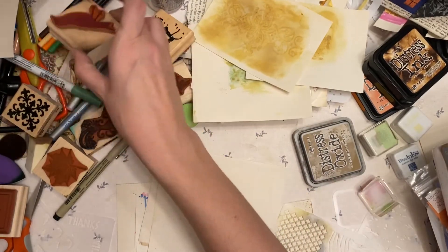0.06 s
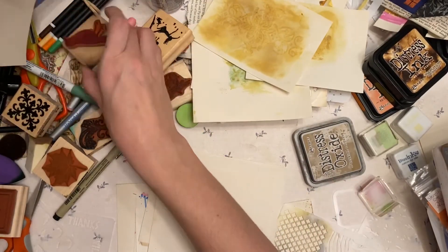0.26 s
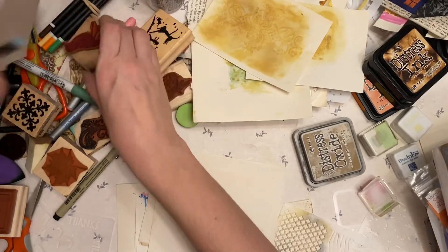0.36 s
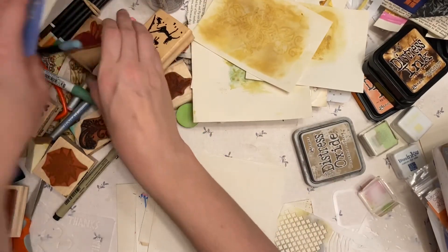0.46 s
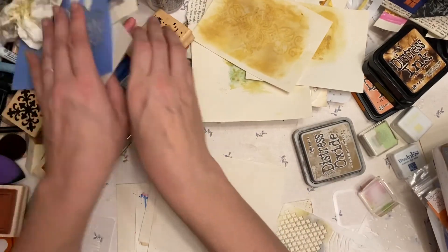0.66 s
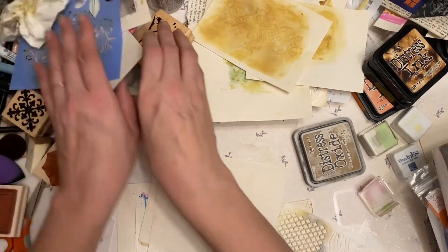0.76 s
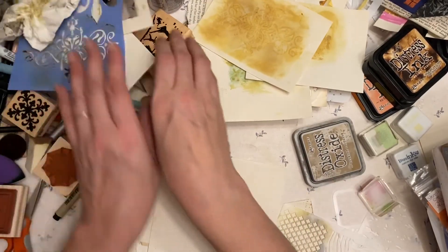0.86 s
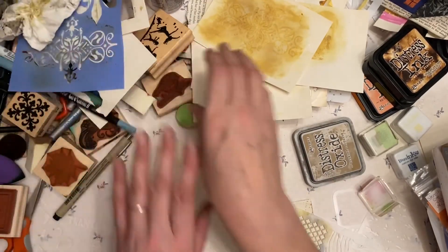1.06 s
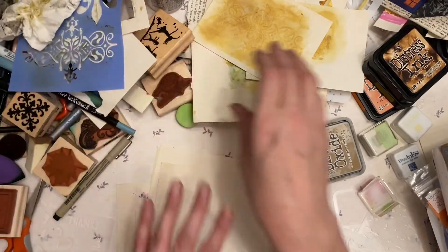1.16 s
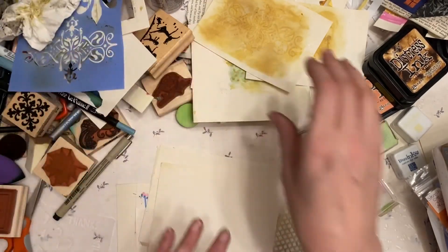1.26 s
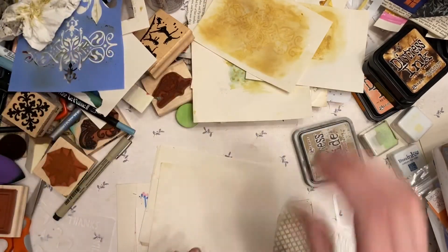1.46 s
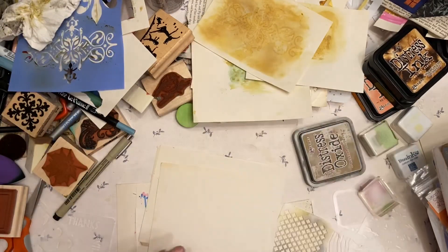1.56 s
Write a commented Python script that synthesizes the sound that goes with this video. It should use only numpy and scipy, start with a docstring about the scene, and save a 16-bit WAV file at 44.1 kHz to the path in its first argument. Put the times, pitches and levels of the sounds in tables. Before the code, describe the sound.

Close stereo pickup in a small furnished room: faint scuffs, a burst of low wooden thumps, juddering plastic scraping with another sharp knock and small clicks, then only soft rumble and faint hiss.

```python
"""Wooden stamp blocks are nudged and set down on a cluttered craft table, heard from close by.
Each knock is built from a table-top thump, a clack that rings the block and a tick at its edge.
A plastic stencil drags over the clutter as grainy, juddering noise: a dull rub and a bright hiss.
Small scuffs and pitched edge squeaks fall between the knocks, with a short room echo on all but
the thumps; the movement then fades, leaving the quiet room: low rumble and faint hiss."""
import sys
import numpy as np
from scipy import signal
from scipy.fft import rfft, irfft
from scipy.io import wavfile
from scipy.ndimage import uniform_filter1d, map_coordinates

SR = 44100
rng = np.random.default_rng(int(sys.argv[2]) if len(sys.argv) > 2 else 0)


def unload_audio(sound):
    """Save the sound as a 16-bit wav file, at the path given as the first command line argument."""
    columns = np.transpose(np.atleast_2d(sound))
    # keep every value between -1 and 1, then stretch to whole-number steps
    steps = np.round(np.clip(columns, -1, 1) * 32767)
    wavfile.write(sys.argv[1], SR, steps.astype(np.int16))


N = 70560
HZ = np.fft.rfftfreq(N, 1 / SR)
TIME = np.arange(N) / SR
RING_S = np.arange(SR // 4) / SR  # time axis of one blow

# hiss of the sliding stencil: (time [s], level [dB])
SLIDE_HISS_LEVEL = [(0, -68), (.09, -78), (.15, -67.5), (.21, -69), (.255, -81), (.295, -62.5),
                    (.37, -57.5), (.402, -51), (.423, -55.5), (.44, -58), (.475, -55), (.52, -52.5),
                    (.6, -55), (.67, -51), (.724, -50), (.745, -62.5), (.81, -57.5), (.86, -60.5),
                    (.97, -68), (1.12, -80), (1.6, -79)]
# dull rubbing of the sliding stencil: (time [s], level [dB])
SLIDE_RUB_LEVEL = [(0, -76), (.11, -62), (.2, -65.5), (.28, -58), (.37, -61.5), (.5, -55), (.52, -46.5),
                   (.56, -50.5), (.605, -49), (.64, -45), (.69, -52), (.735, -56), (.77, -47),
                   (.783, -53.5), (.82, -57.5), (.9, -76), (1.02, -68.5), (1.15, -77), (1.36, -72.5),
                   (1.6, -77)]
# colour of the stencil's hiss: (frequency [Hz], relative density [dB per Hz])
HISS_SPECTRUM = [(300, -23), (1500, -9), (2700, 7.5), (4000, -1), (5300, 7.5), (6800, -6), (8500, 3),
                 (10500, 3), (12500, -0.5), (14000, -36), (16000, 2.5)]
# colour of the stencil's rub: (frequency [Hz], relative density [dB per Hz])
RUB_SPECTRUM = [(60, 9), (200, 1), (400, 7), (800, 1.5), (1400, 2), (2000, 0.5), (2600, -4.5),
                (5000, -11.5), (16000, -18)]
# decay of the room echo: (frequency [Hz], t60 [s])
ECHO_DECAY = [(100, 0.063), (500, 0.74), (2000, 0.48), (8000, 0.084), (16000, 0.41)]
# colour of the room tone: (frequency [Hz], relative density [dB per Hz])
ROOM_SPECTRUM = [(20, -57), (45, 6), (90, 1.5), (160, -6), (235, -1), (320, -12), (460, -7.5), (650, -35.5),
                 (1100, -26.5), (1900, -16.5), (3000, -32), (5500, -32.5), (9500, -35), (16000, -36)]
# short scuffs of wood and plastic: (time of peak [s], Gaussian spread [s], level [dB], band centre [Hz])
SCUFF_EVENTS = [(0.122, 0.01, -60, 3800), (0.143, 0.004, -51.5, 4450), (0.163, 0.022, -59, 4270),
                (0.395, 0.0051, -44, 5580), (0.432, 0.0014, -41.5, 10700), (0.45, 0.011, -51.5, 4900),
                (0.519, 0.007, -47.5, 4470), (0.547, 0.0064, -46.5, 10300), (0.588, 0.0021, -50.5, 10400),
                (0.673, 0.0018, -48.5, 10400), (0.7889, 0.0012, -42, 9800), (0.794, 0.0039, -55.5, 4130),
                (0.808, 0.0072, -47.5, 4650), (0.839, 0.0022, -57.5, 10400), (1.005, 0.0057, -65.5, 1680),
                (1.03, 0.0087, -72, 1850)]
# colour of scuffing before each band is picked: (frequency [Hz], relative density [dB per Hz])
SCUFF_SPECTRUM = [(150, -1), (600, 0), (1300, 6), (2700, -4), (3800, -1.5), (5300, -6), (6800, -2.5),
                  (9500, -3.5), (13000, -11), (16000, -10)]
# a block lands and the table top gives: (time [s], level before halving [dB], pitch [Hz], t60 [s])
THUMP_EVENTS = [(0.111, -51, 248, 0.081), (0.2293, -39.5, 373, 0.025), (0.233, -25, 193, 0.01),
                (0.246, -32.5, 288, 0.025), (.254, -31.5, 144, 0.088), (.281, -24.5, 182, 0.031),
                (0.3036, -15.5, 210, 0.024), (.310, -29.5, 325, 0.058), (0.316, -34.5, 236, 0.035),
                (0.332, -30, 195, 0.041), (0.344, -35, 227, 0.028), (.402, -46, 250, 0.11),
                (0.4327, -27.5, 186, 0.09), (0.6259, -20.5, 185, 0.036), (0.582, -41, 185, 0.049),
                (0.772, -46.5, 175, 0.066), (1.007, -48.5, 181, 0.039)]
# ringing modes of the table top: (frequency [Hz], relative level [dB], t60 [s])
TABLE_MODES = [(65.6, -23, 0.061), (104, 9, 0.049), (139.6, 6, 0.2), (190.3, 1, 0.24), (318, -5, 0.049),
               (392, 8, 0.24)]
# blocks and pads touch:
# (time [s], clack level [dB], lowest [Hz], highest [Hz], chatter t60 [s], edge tick level [dB])
CLACK_EVENTS = [(0.1402, -52.5, 1160, 1380, 0.062, -70), (.2287, -40, 600, 2430, 0.023, -70),
                (0.266, -47.5, 1120, 1680, 0.012, -45.5), (.2775, -46.5, 836, 1400, 0.031, -51),
                (0.2985, -37.5, 605, 790, 0.0097, -57), (0.3095, -60, 1010, 1370, 0.023, -52.5),
                (.3308, -49, 515, 1480, 0.056, -68), (0.3931, -48, 2370, 3900, 0.035, -70),
                (.4300, -47, 1670, 2900, 0.08, -49), (0.489, -44, 1600, 4640, 0.043, -49),
                (0.5109, -43.5, 447, 1900, 0.055, -44.5), (0.6247, -27.5, 515, 1550, 0.012, -38.5),
                (0.6566, -45, 1210, 1870, 0.16, -52), (.6885, -45.5, 900, 1180, 0.054, -63),
                (0.7467, -46.5, 564, 1310, 0.12, -79), (0.7625, -45, 815, 1920, 0.12, -45),
                (0.7888, -39.5, 1100, 2020, 0.028, -45), (0.8096, -43, 670, 2030, 0.02, -50.5),
                (0.8617, -56, 4600, 5240, 0.01, -56), (0.89, -70, 4700, 5200, 0.022, -55.5),
                (0.9622, -60.5, 1120, 2440, 0.023, -78), (1.0814, -56, 590, 3130, 0.039, -67)]
# ringing modes of a stamp block: (frequency [Hz], relative level [dB], t60 [s])
BLOCK_MODES = [(698, 6, 0.061), (865, -2, 0.068), (1120, 2.5, 0.06), (1327, 2.5, 0.039), (1626, 3.5, 0.02),
               (2120, -13.5, 0.021), (2940, -1.5, 0.026), (3800, -16, .016), (5730, -8, 0.011)]
# colour of the edge tick: (frequency [Hz], relative density [dB per Hz])
TICK_SPECTRUM = [(200, -23), (1200, 13), (2800, 6.5), (4200, 7), (5400, 9), (7000, 4.5), (10500, -5.5),
                 (13000, 1), (16000, -13.5)]
# a block drops and bounces once: (time [s], level [dB])
DROP_EVENTS = [(0.2288, -36), (.2505, -77)]
# edges squeak as they skid: (time [s], hold [s], level [dB], start pitch [Hz], end pitch [Hz])
CHIRP_EVENTS = [(0.6187, 0.0036, -35, 1940, 1915), (0.6878, 0.0066, -40, 1284, 1582),
                (0.72, 0.0048, -53.5, 5120, 5200)]
# how far the left port leads the right: (frequency [Hz], phase [rad])
PORT_PHASE_LEAD = [(20, 0), (300, .02), (1700, .1), (2580, 1.0), (4310, .9), (5080, -.3), (6460, 2.4),
                   (7450, 3.14), (8400, 3.9), (9730, 6.1), (11600, 6.9), (12600, 9.0), (13500, 9.42),
                   (14400, 9.8), (15300, 12.2)]
# likeness of left and right: (frequency [Hz], share in common [0 to 1])
PORT_LIKENESS_SHARE = [(20, 1), (400, 0.79), (1500, 0.88), (2800, 0.45), (7000, 1), (16000, 0.91)]
# left minus right: (frequency [Hz], balance [dB])
PORT_LEVEL_BALANCE = [(300, 0.33), (700, 4), (1400, 0.4), (2800, -1.5), (9000, -0.1)]

GRAINS_PER_S, GRAIN_SPREAD_DB, SMOOTH_SHARE = 2000, 2.6, 0.45
JUDDER_DB, JUDDER_HZ = 1.64, 130
PATCH_DB, PATCH_HZ, PATCH_S, PATCH_ABOVE_HZ = 4, 220.1, 0.018, 860
ECHO_DB, ROOM_DB = -16.5, -64
SCUFF_OCTAVES, SCUFF_SKIRT_DB = 0.35, -6
THUMP_RISE_S, TABLE_RING_DB = 0.0019, -17.5
CLACK_RISE_S, CLACK_SNAP_DB, BLOCK_RING_DB, TICK_T60_S = 0.00032, 16.5, -20, 0.021
CHIRP_RISE_S, CHIRP_T60_S, CHIRP_OVERTONE_DB = 0.00063, 0.021, -11
CHIRP_WAVER = 0.083  # rms, as a fraction of the pitch
LOW_CUT_HZ, EDGE_HZ = 65.3, 15850


def amp(db):
    """Decibels to gain."""
    return 10 ** (np.asarray(db) / 20)


def unit(x):
    """Scales to rms 1."""
    return x / np.sqrt(np.mean(x ** 2) + 1e-20)


def struck(x):
    """Scales a blow to rms 1 over its loudest few milliseconds."""
    return x / np.sqrt(uniform_filter1d(x ** 2, size=128).max() + 1e-20)


def read(points, hz):
    """Reads a table on a log-frequency axis."""
    f, value = np.transpose(points)
    return np.interp(np.log(hz + 1), np.log(f + 1), value)


def colour(x, spectrum):
    """Gives a sound a spectrum, at rms 1."""
    gain = amp(read(spectrum, np.fft.rfftfreq(len(x), 1 / SR)))
    return unit(irfft(rfft(x) * gain, len(x)))


def fade(t, t60):
    """Exponential decay that falls 60 dB in t60 seconds."""
    return np.exp(-np.log(1000) * t / t60)


def add(mix, s, sound):
    """Mixes a sound in at a time, cutting it at the end of the mix."""
    part = mix[round(s * SR):][:len(sound)]
    part += sound[:len(part)]


def ring(x, modes):
    """An object's modes, decaying sines of alternating sign, ring when driven by x."""
    response = np.zeros(len(RING_S))
    for k, (hz, db, t60) in enumerate(modes):
        response += (-1) ** k * amp(db) * fade(RING_S, t60) * np.sin(2 * np.pi * hz * RING_S)
    return struck(signal.fftconvolve(x, response)[:len(x)])


def pair(a, b):
    """Two independent sounds become a partly alike left and right."""
    same = np.clip(read(PORT_LIKENESS_SHARE, HZ), 0, 1)
    right = irfft(same * rfft(a) + np.sqrt(1 - same ** 2) * rfft(b), N)
    return np.array([a, right])


def patchy(x):
    """Brief resonances come and go as the point of contact moves, mostly in the treble."""
    hz, t, z = signal.stft(x, SR, nperseg=512, noverlap=384)
    grid = rng.standard_normal((400, 400))
    places = np.meshgrid(hz / PATCH_HZ, t / PATCH_S, indexing="ij")
    field = map_coordinates(grid, places, order=1, mode="mirror")
    depth_db = PATCH_DB * hz[:, None] / (hz[:, None] + PATCH_ABOVE_HZ)
    return signal.istft(z * amp(depth_db * unit(field)), SR, nperseg=512, noverlap=384)[1][:, :N]


def slips():
    """Dense tiny slips of uneven size over a smooth hiss."""
    starts = rng.random(N) < GRAINS_PER_S / SR
    signs = rng.choice([-1, 1], N)
    sizes = amp(GRAIN_SPREAD_DB * np.minimum(rng.exponential(1, N), 4))
    grains = unit(starts * signs * sizes)
    return SMOOTH_SHARE * rng.standard_normal(N) + (1 - SMOOTH_SHARE) * grains


def friction(spectrum):
    """Slips whose level judders slowly and at random, coloured and heard at both ports."""
    slow_noise = unit(irfft(rfft(rng.standard_normal(N)) / (1 + (HZ / JUDDER_HZ) ** 4), N))
    judder = amp(JUDDER_DB * slow_noise)
    left, other = colour(slips() * judder, spectrum), colour(slips() * judder, spectrum)
    return unit(patchy(pair(left, other)))


def stencil():
    """The plastic sheet slides: friction gives a dull rub and a bright hiss, each with its own level."""
    hiss_gain = amp(np.interp(TIME, *np.transpose(SLIDE_HISS_LEVEL)))
    rub_gain = amp(np.interp(TIME, *np.transpose(SLIDE_RUB_LEVEL)))
    return friction(HISS_SPECTRUM) * hiss_gain + friction(RUB_SPECTRUM) * rub_gain


def echo(x):
    """The short tail of a small furnished room: noise that decays at its own rate in each band."""
    hz, t, z = signal.stft(rng.standard_normal((2, SR // 2)), SR, nperseg=256)
    decay = fade(t, read(ECHO_DECAY, hz)[:, None])
    tail = signal.istft(z * decay, SR, nperseg=256)[1]
    return signal.fftconvolve(x, tail / np.linalg.norm(tail[0]), axes=1)[:, :N]


def room_tone():
    """Steady low rumble and faint hiss, made of coloured noise."""
    left, other = (colour(rng.standard_normal(N), ROOM_SPECTRUM) for _ in range(2))
    return amp(ROOM_DB) * pair(left, other)


def scuffs():
    """Things shift a little against each other: swells of friction, each with its own brightness."""
    out = np.zeros((2, N))
    rubbing = rfft(friction(SCUFF_SPECTRUM))
    for s, spread, db, centre_hz in SCUFF_EVENTS:
        octaves = np.log2((HZ + 1) / centre_hz)
        band = np.exp(-0.5 * (octaves / SCUFF_OCTAVES) ** 2) + amp(SCUFF_SKIRT_DB)
        swell = np.exp(-0.5 * ((TIME - s) / spread) ** 2)
        out += unit(irfft(rubbing * band, N)) * amp(db) * swell
    return out


def thumps():
    """The table top swings a few times under each block, then rings on faintly."""
    out = np.zeros(N)
    rise = 1 - np.exp(-(RING_S / THUMP_RISE_S) ** 2)
    for s, db, hz, t60 in THUMP_EVENTS:
        swing = struck(rise * fade(RING_S, t60) * np.sin(2 * np.pi * hz * RING_S))
        table_ring = amp(TABLE_RING_DB) * ring(swing, TABLE_MODES)
        add(out, s, amp(db) * (swing + table_ring) / 2)
    return out


def clacks():
    """Each touch is a snap and a brief chatter that ring the block, with a bright tick from its edge."""
    out, ticks = np.zeros(N), np.zeros((2, N))
    attack = 1 - np.exp(-RING_S / CLACK_RISE_S)
    snap = amp(CLACK_SNAP_DB) * (RING_S == 0)  # a single sample
    for s, db, low_hz, high_hz, t60, tick_db in CLACK_EVENTS:
        chatter, *edges = rng.standard_normal((3, len(RING_S)))
        force = chatter * attack * fade(RING_S, t60) + snap
        band = signal.butter(2, [low_hz, high_hz], "bandpass", fs=SR, output="sos")
        burst = struck(signal.sosfilt(band, force))
        block_ring = amp(BLOCK_RING_DB) * ring(burst, BLOCK_MODES)
        add(out, s, amp(db) * struck(burst + block_ring))
        for port, edge in zip(ticks, edges):
            tick = struck(colour(edge, TICK_SPECTRUM) * attack * fade(RING_S, TICK_T60_S))
            add(port, s, amp(tick_db) * tick)
    return out + pair(*ticks)


def drops():
    """A block falls free of the fingers, so one clean blow rings all its modes at each landing."""
    out = np.zeros(N)
    blow = 1.0 * (RING_S == 0)
    for s, db in DROP_EVENTS:
        add(out, s, amp(db) * ring(blow, BLOCK_MODES))
    return out


def chirps():
    """An edge sticks and slips for a few cycles: a pitched squeak with an overtone, dying quickly."""
    out = np.zeros(N)
    for s, hold, db, start_hz, end_hz in CHIRP_EVENTS:
        waver = CHIRP_WAVER * unit(uniform_filter1d(rng.standard_normal(len(RING_S)), size=24))
        pitch_hz = np.interp(RING_S, [0, hold], [start_hz, end_hz]) * (1 + waver)
        phase = 2 * np.pi * np.cumsum(pitch_hz) / SR
        level = np.minimum(RING_S / CHIRP_RISE_S, 1) * fade(np.maximum(RING_S - hold, 0), CHIRP_T60_S)
        tone = np.sin(phase) + amp(CHIRP_OVERTONE_DB) * np.sin(2 * phase)
        add(out, s, amp(db) * struck(level * tone))
    return out


def scene():
    """Everything on the table, in the room; the thumps alone send nothing to the echo."""
    clutter = drops() + clacks() + chirps() + scuffs() + stencil()
    return thumps() + clutter + amp(ECHO_DB) * echo(clutter) + room_tone()


def record(dry):
    """Two close microphone ports hear the treble out of step; then a rumble filter and a band limit."""
    # half of the balance and phase goes to the left port, the inverse to the right
    lead = amp(read(PORT_LEVEL_BALANCE, HZ) / 2) * np.exp(0.5j * read(PORT_PHASE_LEAD, HZ))
    ports = irfft(rfft(dry) * np.array([lead, 1 / lead]), N)
    rumble_filter = signal.butter(2, LOW_CUT_HZ, "highpass", fs=SR, output="sos")
    ports = signal.sosfilt(rumble_filter, ports)
    band_limit = signal.firwin(511, EDGE_HZ, window=("kaiser", 9), fs=SR)
    return signal.oaconvolve(ports, band_limit[None], "same")


dry = scene()
out = record(dry)
unload_audio(out)
```